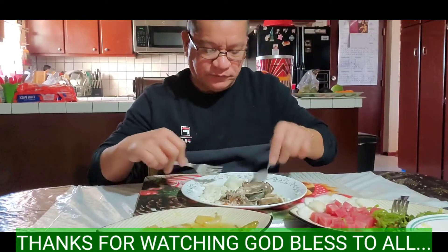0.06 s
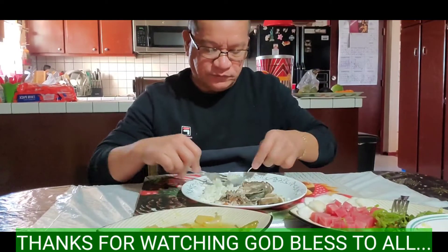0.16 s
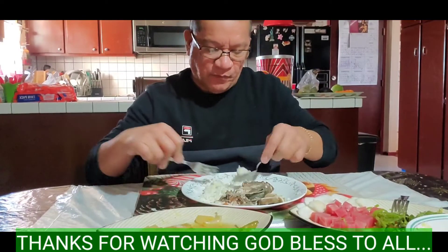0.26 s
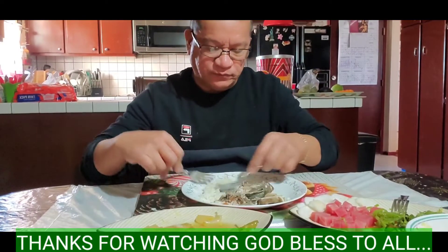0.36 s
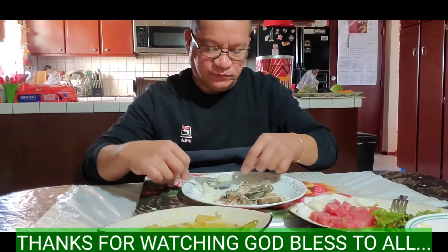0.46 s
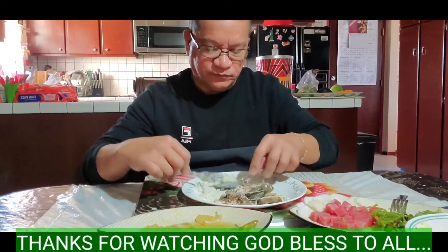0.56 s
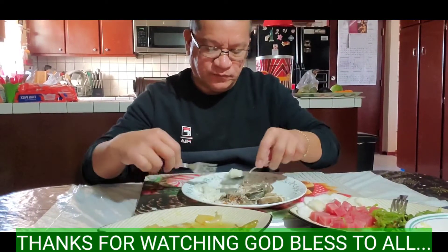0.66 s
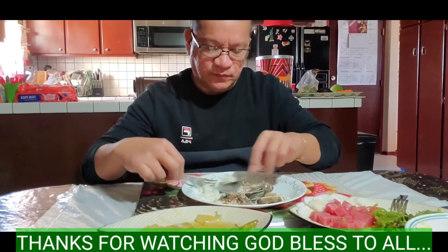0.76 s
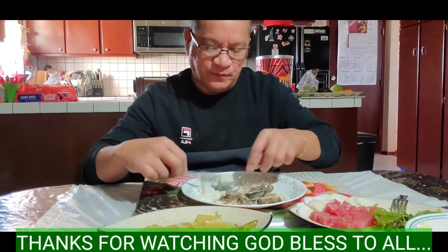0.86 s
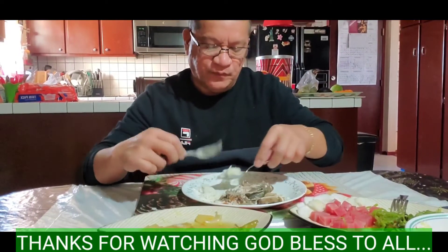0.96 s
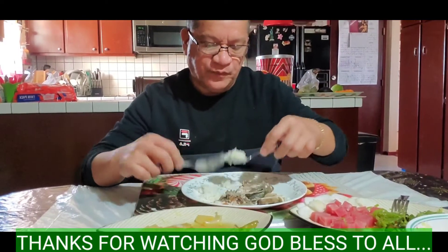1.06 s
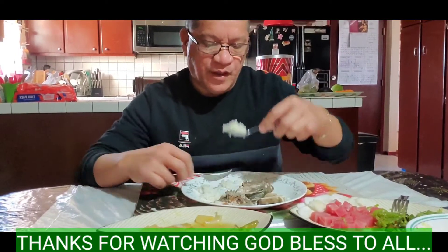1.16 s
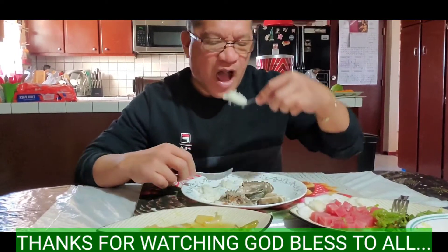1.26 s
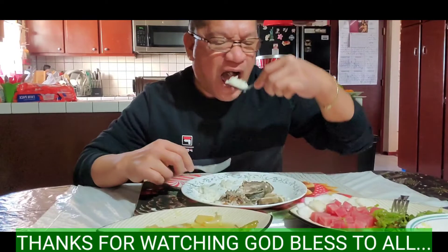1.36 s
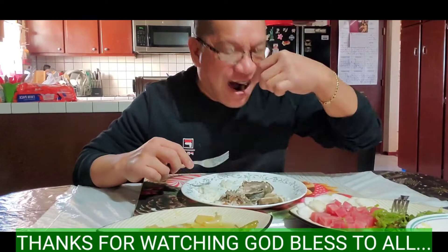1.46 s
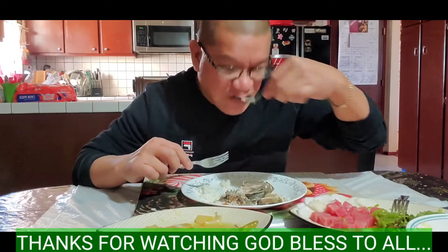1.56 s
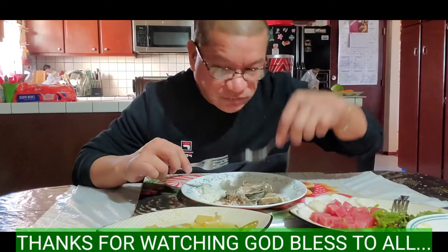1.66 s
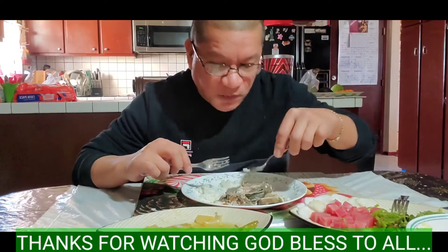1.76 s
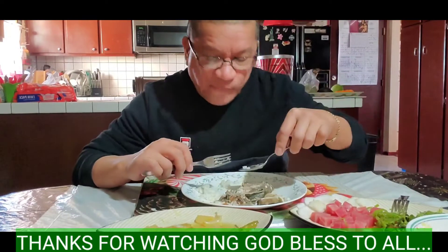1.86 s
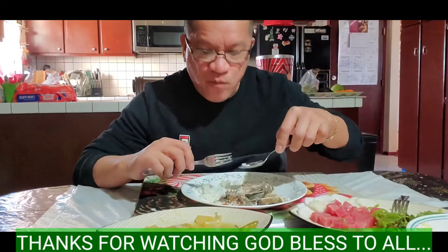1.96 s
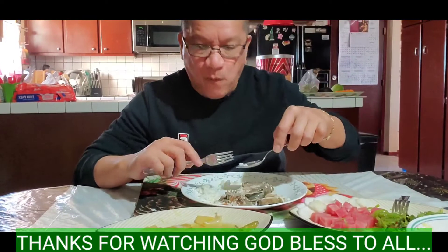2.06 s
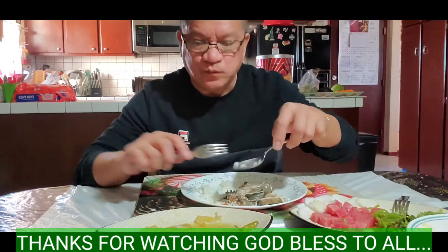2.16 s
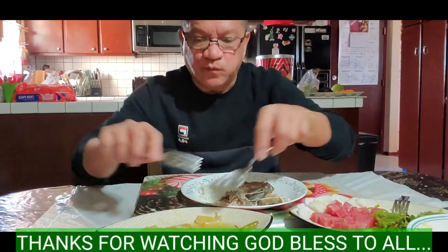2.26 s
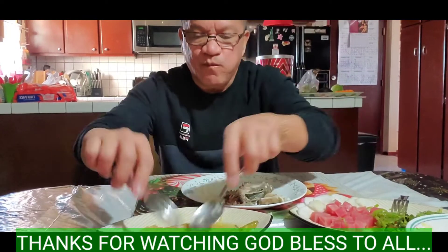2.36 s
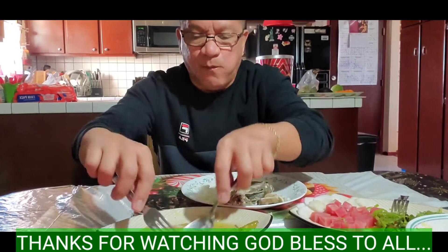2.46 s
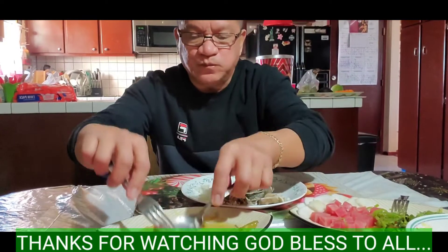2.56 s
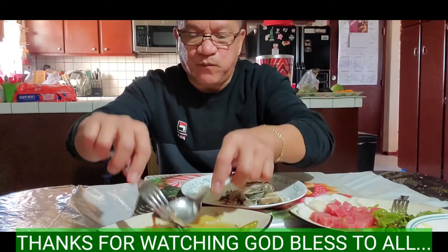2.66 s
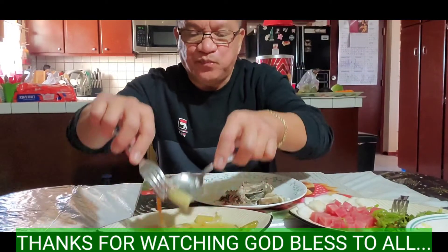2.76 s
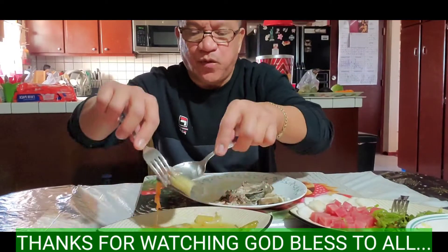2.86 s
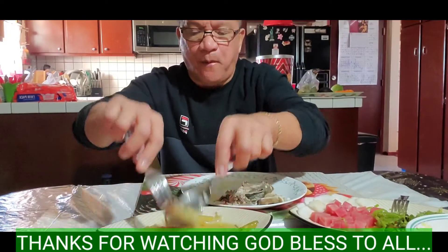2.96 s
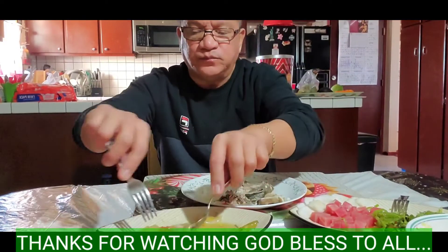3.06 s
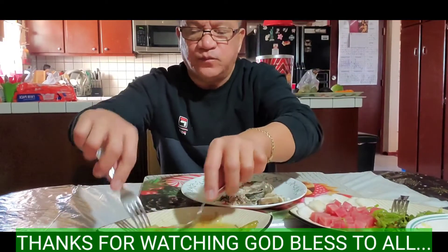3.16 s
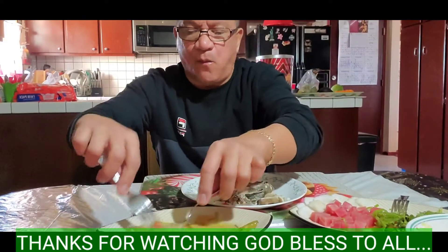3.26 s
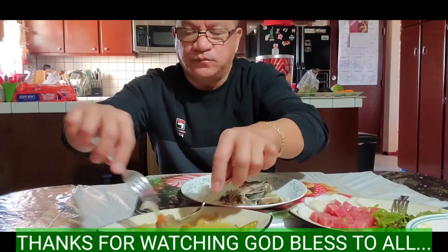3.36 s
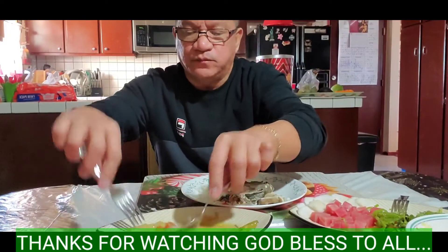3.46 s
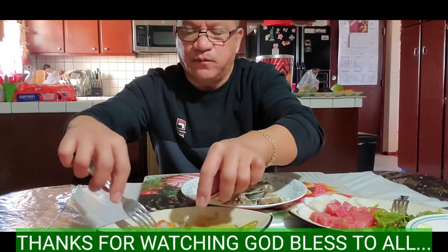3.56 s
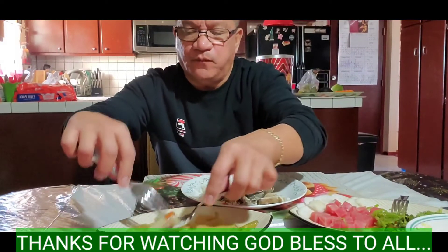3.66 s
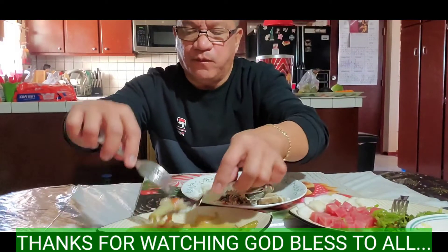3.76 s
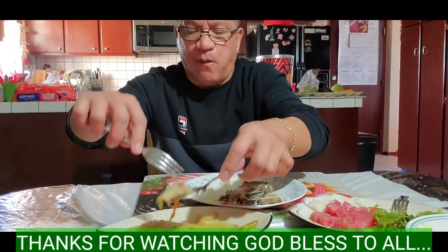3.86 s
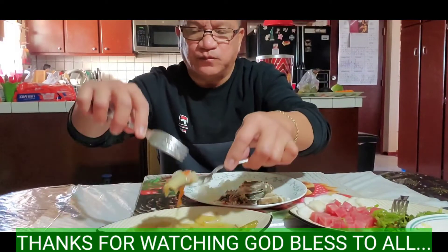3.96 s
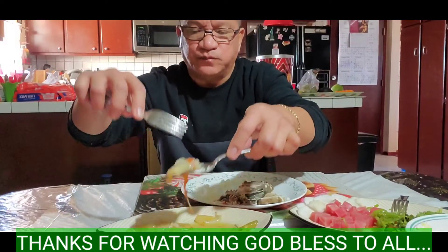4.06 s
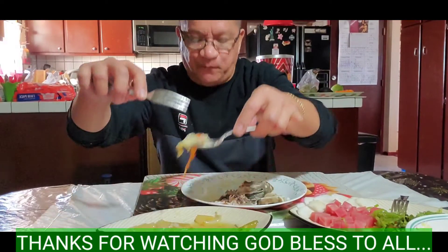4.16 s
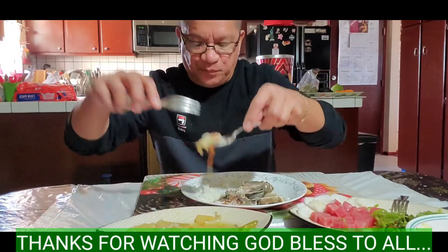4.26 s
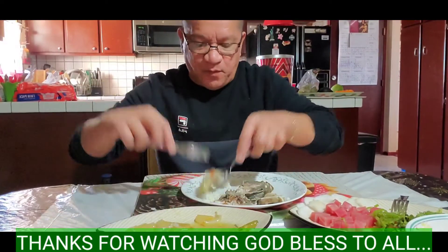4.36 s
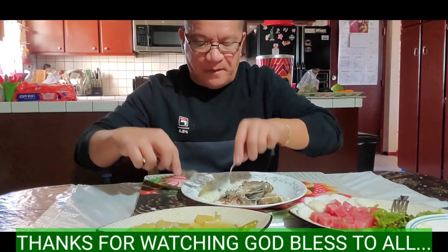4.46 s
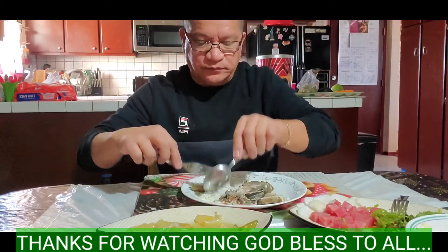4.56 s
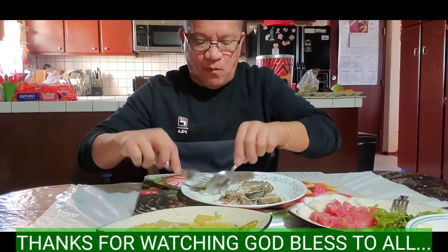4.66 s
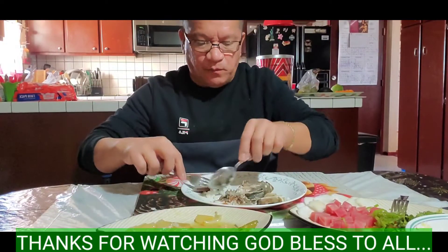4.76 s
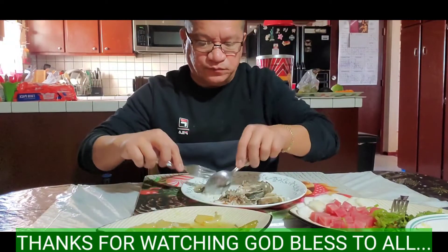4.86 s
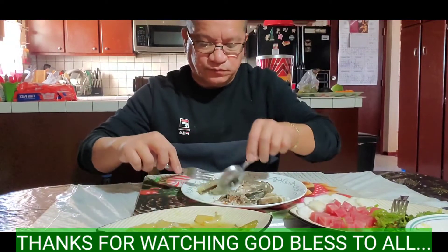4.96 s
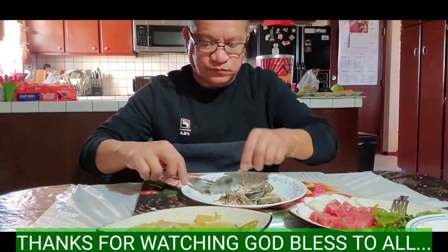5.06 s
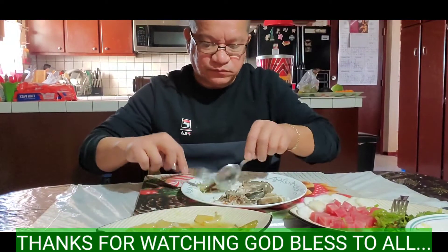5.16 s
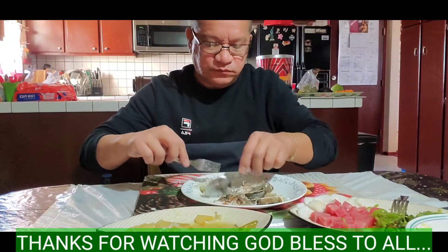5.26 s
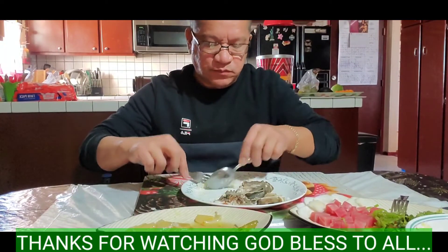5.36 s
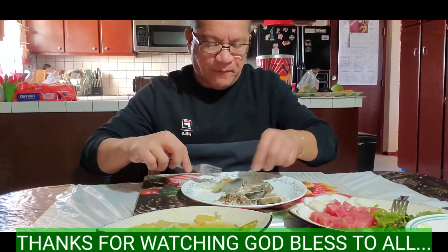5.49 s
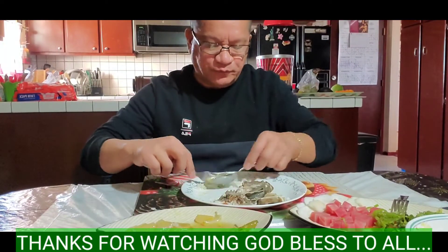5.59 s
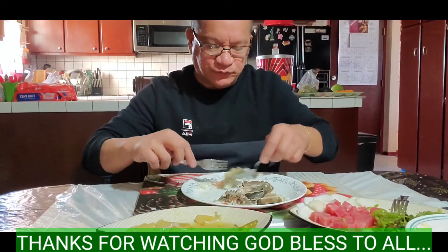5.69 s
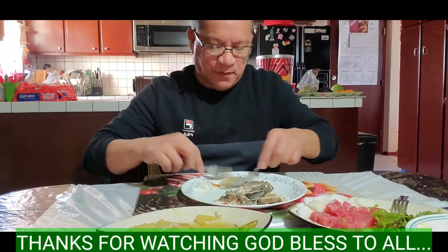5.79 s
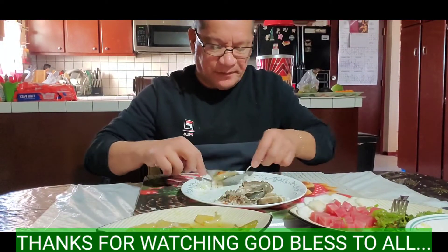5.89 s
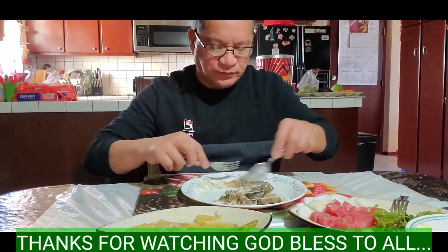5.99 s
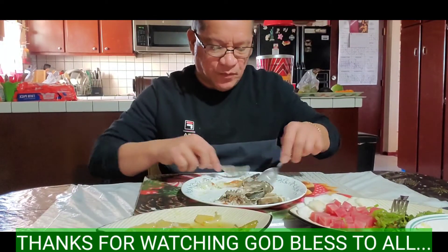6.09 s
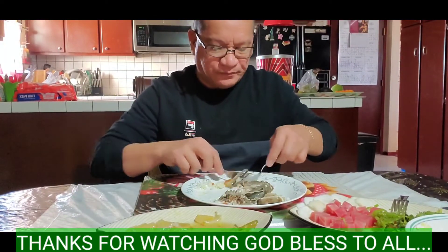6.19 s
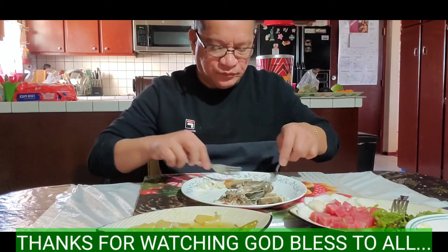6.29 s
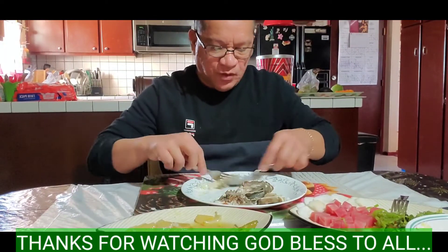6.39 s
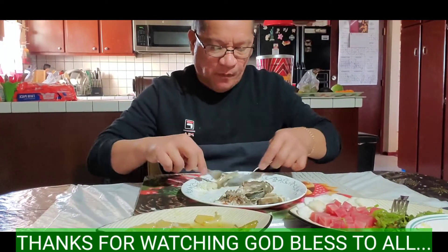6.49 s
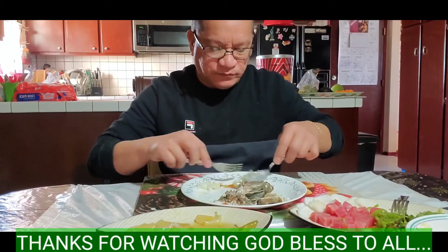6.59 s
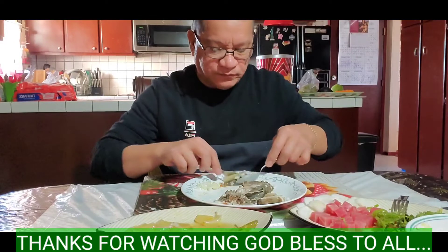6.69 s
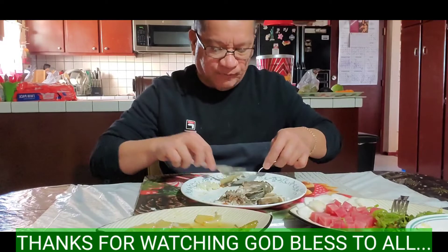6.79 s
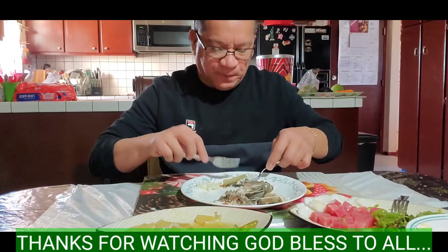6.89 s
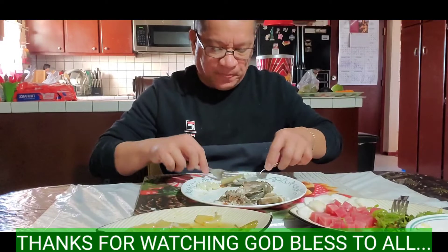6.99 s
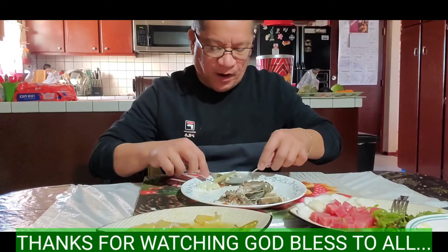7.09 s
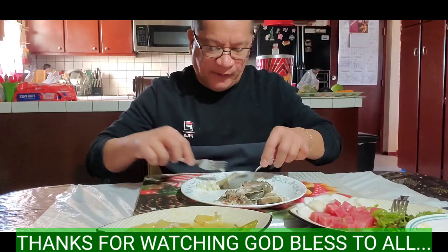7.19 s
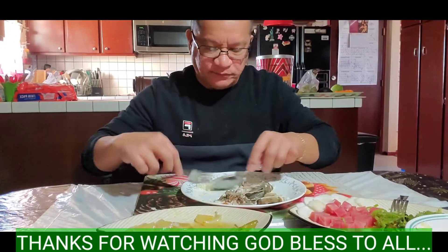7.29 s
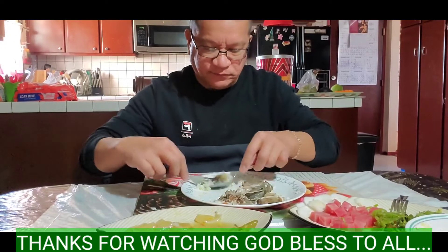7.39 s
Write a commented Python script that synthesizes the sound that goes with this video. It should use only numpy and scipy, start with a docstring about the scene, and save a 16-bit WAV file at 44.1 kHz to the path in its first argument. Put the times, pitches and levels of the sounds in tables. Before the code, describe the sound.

Short, dry clacks of cutlery on a food-damped ceramic dish, mixed with ringing clinks of spoon against fork and two brief gritty scrapes. The activity starts brisk, thins to tiny ticks and dull table bumps, then becomes busy again in the second half. Heard close on spaced microphones at a dining table, with short kitchen reflections and a very quiet low hum of fans.

```python
"""A spoon and a fork knock on a food-laden ceramic plate and against each other at a dining table.
Impact excites damped modes: every blow rings briefly in table, plate and steel, then in a hard-walled kitchen.
Dull bumps boom in the table top, light touches ring singly; rubs and scrapes are bands of uneven noise grains.
Behind them two fans hum as steady tones over filtered noise; a pair of spaced microphones hears it all."""
import sys
import numpy as np
from scipy import signal
from scipy.io import wavfile

SR = 44100
rng = np.random.default_rng(int(sys.argv[2]) if len(sys.argv) > 2 else 0)


def pcm_store(signal):
    """Save signal as 16-bit PCM."""
    levels = np.round(np.clip(np.atleast_2d(signal), -1, 1) * 32767)
    wavfile.write(sys.argv[1], SR, levels.astype(np.int16).T)


N = 327663   # samples, 7.43 s


def amp(db):
    """Level law: 20 dB is a factor of ten in amplitude."""
    return 10 ** (np.asarray(db) / 20)


def at_hz(points, hz):
    """Logarithmic frequency scale: interpolate a (f/Hz, value) table along it, holding the end values."""
    f, value = np.array(points).T
    return np.interp(np.log(hz), np.log(f), value)


def ring(force, hz, t60):
    """Damped resonator: a unit impulse sets off a decaying sine of nominal height 1; t60 is at least 2 ms."""
    radius = amp(-60 / (max(t60, .002) * SR))
    angle = 2 * np.pi * hz / SR
    # the tiny offset keeps the filter away from denormal numbers
    return signal.lfilter([0, np.sin(angle)], [1, -2 * radius * np.cos(angle), radius ** 2], force + 1e-18)


def band_pass(order, band, x):
    """Band-pass filtering: only the part of the spectrum between two frequencies is kept."""
    return signal.sosfilt(signal.butter(order, band, "band", fs=SR, output="sos"), x)


# coherence of a diffuse field at two spaced microphones: (f/Hz, left-right correlation)
DIFFUSE_COHERENCE = [(40, .8), (100, .93), (290, .95), (640, .7), (1400, .35), (3100, .1), (15000, 0)]


def diffuse_bands(size):
    """Diffuse-field coherence: half-octave stereo noise, alike in the bass, unrelated in the treble."""
    edges = 20 * 2 ** np.arange(0, 10.1, .5)
    tops = np.minimum(edges[1:], .45 * SR)
    white = rng.standard_normal((2, 2, size))
    for k, (low, high) in enumerate(zip(edges, tops)):
        # neighbouring bands draw on different noise
        mid, side = band_pass(2, [low, high], white[k % 2])
        hz = np.sqrt(low * high)
        alike = np.clip(at_hz(DIFFUSE_COHERENCE, hz), 0, 1)
        yield hz, np.sqrt(1 + alike) * mid + np.sqrt(1 - alike) * side * [[1], [-1]]


# tones of blades at 85 and 94 passes a second, and their side tones: (f/Hz, rms level/dB)
FAN_TONES = [(85, -86.5), (94.2, -77.5), (169.9, -80), (173.4, -94), (188.6, -72.5), (191.9, -75),
             (233, -78.5), (255, -73), (277.1, -75.5), (340, -72.5), (381.4, -82), (425.1, -82.5),
             (471.4, -79), (520, -85.5), (565.9, -82.5), (680, -84)]
# spectral density of fan draught and hiss, relative: (f/Hz, level/dB per Hz)
FAN_DRAUGHT = [(15, -104), (25, -70.5), (83, -10.5), (135, -14.5), (177, -7), (220, -16), (245, -4),
               (339, 0), (399, -10.5), (470, -7.5), (726, -19.5), (1150, -19.5), (2090, -35.5),
               (4130, -41.5), (16500, -49)]
DRAUGHT_RMS_DB = -66.5


def fans():
    """Blade-passing tones: steady sines at random phase over broadband flow noise."""
    t = np.arange(N) / SR
    tones = sum(np.sqrt(2) * amp(db) * np.sin(2 * np.pi * (hz * t + rng.random())) for hz, db in FAN_TONES)
    draught = sum(amp(at_hz(FAN_DRAUGHT, hz)) * noise for hz, noise in diffuse_bands(N))
    return tones + amp(DRAUGHT_RMS_DB) * draught / draught.std()


# reverberation time of the kitchen: (f/Hz, t60/s)
KITCHEN_T60 = [(100, 0.61), (300, .5), (1000, 0.27), (4000, 0.26), (14000, 0.25)]
ROOM_DB, ROOM_BUILD_S = -26.5, .006
NEAR_DB, NEAR_T60_S = 3, .04   # early energy from near surfaces, relative to the tail


def kitchen(dry):
    """Reverberation: reflections set in after a short gap, strong at first, then decay band by band."""
    t = np.arange(round(.7 * SR)) / SR
    tail = sum(noise * amp(-60 * t / at_hz(KITCHEN_T60, hz)) for hz, noise in diffuse_bands(len(t)))
    build_up = 1 - np.exp(-(t / ROOM_BUILD_S) ** 2)
    near_surfaces = 1 + amp(NEAR_DB - 60 * t / NEAR_T60_S)
    tail *= build_up * near_surfaces
    return amp(ROOM_DB) * signal.fftconvolve(dry, tail, axes=1)[:, :N]


# rubs and scrapes, the two loudest of cutlery rattling between blows:
# (t/s, length/s, centre f/Hz, width/octaves, level/dB rms before the fade)
RUBS_AND_SCRAPES = [(1.639, 0.13, 5960, 6, -84), (2.405, 0.051, 9000, 1.5, -84.5),
                    (2.927, 0.04, 7940, 1.9, -75.5), (3.054, 0.046, 10100, 10, -77.5),
                    (4.33, 0.054, 3450, 0.64, -80), (4.57, 0.077, 13140, 0.54, -89),
                    (5.946, .09, 4500, 2.16, -87), (5.983, 0.056, 3575, 2.6, -61),
                    (6.541, 0.061, 3600, 2.2, -64), (7.276, 0.11, 7000, 4.2, -80.5),
                    (1.356, 0.047, 1600, 0.36, -79), (3.856, 0.12, 1550, 0.15, -78),
                    (7.376, 0.067, 2170, 0.41, -78.5), (2.182, 0.052, 3950, 0.71, -89)]


def rubs_and_scrapes():
    """Friction noise: dense uneven grains through a band, with a sharp onset and a fade."""
    out = np.zeros(N)
    grains = rng.standard_normal(N) * amp(3.2 * np.minimum(rng.exponential(1, N), 5))
    for s, length, hz, octaves, level_db in RUBS_AND_SCRAPES:
        at, size = round(s * SR), round(length * SR)
        half_width = 2 ** (octaves / 2)
        band = [hz / half_width, min(hz * half_width, .45 * SR)]
        stroke = band_pass(2, band, grains[at:at + size])
        fade = np.minimum(np.arange(size) / 200, np.linspace(1, 0, size))
        # the last rub may run past the end
        out[at:at + size] += amp(level_db) * stroke / stroke.std() * fade[:len(stroke)]
    return out


# light touches of steel on steel or food: (t/s, nominal peak level/dB, ring f/Hz)
LIGHT_TOUCHES = [(0.4402, -54, 3720), (1.6541, -63.5, 7330), (1.6794, -59, 4300), (1.726, -62, 4280),
                 (1.7394, -72, 4520), (1.929, -73, 3710), (2.2094, -72.5, 3610), (2.433, -64.5, 4130),
                 (2.523, -63, 4100), (2.819, -62.5, 4250), (2.9354, -64.5, 3300), (3.0616, -70, 11200),
                 (3.3774, -69, 3550), (3.5581, -80.5, 5670), (4.1194, -73.5, 4120), (4.3294, -76, 4020),
                 (4.354, -71.5, 4000), (4.4687, -74.5, 4200), (4.6004, -72, 11340), (4.639, -73, 10600),
                 (4.7284, -75, 3680), (6.9394, -64, 9200), (7.2994, -80, 9070), (7.3544, -78, 9500)]
TOUCH_T60_S, TOUCH_TICK_DB = .011, -12   # tick relative to the ring, before differencing
TICKS_PER_S, TICK_DB = 14, -83   # crackle of food and cloth; lowest level, before differencing


def touches():
    """Single-mode impact: a short ring with a bright doubly differenced tick; fainter ticks fall at random."""
    out, click = np.zeros(N + 2000), np.eye(1, 2000)[0]
    tick = np.diff(click, 2, prepend=[0, 0])
    for s, peak_db, hz in LIGHT_TOUCHES:
        at = round(s * SR)
        out[at:at + 2000] += amp(peak_db) * (ring(click, hz, TOUCH_T60_S) + amp(TOUCH_TICK_DB) * tick)
    tick_falls = rng.random(N) < TICKS_PER_S / SR
    crackle = tick_falls * amp(TICK_DB + 4.3 * np.minimum(rng.exponential(1, N), 3))
    return out[:N] + np.diff(crackle, 2, prepend=[0, 0])


# dull bumps of arm or dish through the table: (t/s, nominal level/dB, f/Hz)
TABLE_BUMPS = [(2.619, -54, 95), (2.891, -63.5, 130.4), (3.419, -57, 104.5), (3.728, -57.5, 90),
               (4.63, -62, 88), (5.47, -55, 100), (6.269, -61.5, 95.8)]


def bumps():
    """Soft impact: a smooth 4.6 ms push sets one low mode of the table top booming, t60 0.12 s."""
    out = np.zeros(N + SR)
    push = np.pad(np.hanning(round(.0046 * SR)), (0, round(.3 * SR)))
    push /= push.sum()
    for s, level_db, hz in TABLE_BUMPS:
        at = round(s * SR)
        out[at:at + len(push)] += amp(level_db) * ring(push, hz, .12)
    return out[:N]


# knocks of cutlery on the dishes, with the strength each body takes up: (t/s, spoon level/dB, fork level/dB,
# steel ring level/dB, plate level/dB, thud level/dB, f/Hz and level/dB of the one note the grip leaves free)
DISH_KNOCKS = [(0.1126, -38.5, -50, -35, -48, -48.5, 4890, -39.5),
               (0.2845, -29.5, -36.5, -33.5, -37.5, -46.5, 5440, -39),
               (0.5402, -34, -45.5, -45.5, -37.5, -51, 5650, -38.5),
               (0.9462, -35.5, -42, -36, -41, -48, 5740, -42),
               (1.708, -55, -54, -64, -64.5, -67, 4400, -56),
               (2.6199, -37, -50.5, -41.5, -67, -48.5, 3664, -37),
               (3.408, -60.5, -53.5, -73.5, -82.5, -59, 4050, -60.5),
               (3.4182, -50.5, -71, -51.5, -74.5, -64.5, 8025, -55.5),
               (3.7589, -56.5, -55.5, -62.5, -67, -64.5, 4560, -52),
               (4.816, -33, -36.5, -43.5, -55, -51, 3730, -40),
               (5.0409, -39, -46.5, -55, -55.5, -53.5, 4680, -48.5),
               (5.251, -42, -51, -43, -46.5, -48.5, 3320, -57.5),
               (5.47, -21.5, -33.5, -29.5, -36.5, -47.5, 5620, -32.5),
               (5.7005, -32, -40.5, -39.5, -40, -49.5, 5630, -56),
               (5.9263, -65, -69.5, -76, -71, -72.5, 3680, -76.5),
               (5.9841, -50.5, -56.5, -52, -55, -64, 5400, -49.5),
               (6.2709, -28.5, -30.5, -35.5, -47, -41, 3890, -44.5),
               (6.5277, -54.5, -45.5, -51, -57, -63, 5320, -52),
               (6.5733, -44.5, -56, -56, -53, -59, 5350, -48),
               (6.8179, -37, -40.5, -42, -52, -47.5, 5580, -38)]
# clinks of spoon against fork, where the steel rings free and the dish takes the jolt:
# (t/s, ring level/dB, rattle level/dB, thud level/dB)
STEEL_CLINKS = [(0.5592, -31, -41, -49.5), (6.0249, -33, -53.5, -45), (6.314, -24, -40.5, -41.5),
                (6.5991, -40, -52.5, -52), (6.8738, -36, -52, -44.5), (7.1787, -31.5, -54.5, -44.5)]
# plate low, plate high, tines, bowl and edge, each relative to the rattle: (level/dB)
CLINK_RATTLE_DB = [-16.5, -17.5, -8.5, 2.5, -14.5]
# while the cutlery works in the serving bowl: (start t/s, end t/s)
SERVING_SPAN = (2.5, 4.0)
SERVING_PLATE_DB = -12.5   # there the plate's upper modes stay quiet
TABLE_DB, PLATE_HIGH_DB = -5, -12   # table over thud, upper plate modes over spoon
EDGE_DB = 2   # over the mean of spoon and fork
CLINK_TABLE_DB = -11   # table over thud
KNOCK_PAN_DB, CLINK_PAN_DB = .86, -1   # left over right


def strengths():
    """Energy sharing: rows in time order of t/s, eight part level/dB, free notes (f/Hz, level/dB), pan/dB."""
    rows = []
    start, end = SERVING_SPAN
    for s, spoon, fork, steel, plate, thud, hz, note_db in DISH_KNOCKS:
        serving = start < s < end
        plate_high = spoon + PLATE_HIGH_DB + serving * SERVING_PLATE_DB
        edge = (spoon + fork) / 2 + EDGE_DB
        parts_db = [thud + TABLE_DB, thud, plate, plate_high, fork, spoon, steel, edge]
        rows.append((s, parts_db, [(hz, note_db)], KNOCK_PAN_DB))
    for s, steel, rattle, thud in STEEL_CLINKS:
        *body, edge = rattle + np.array(CLINK_RATTLE_DB)
        rows.append((s, [thud + CLINK_TABLE_DB, thud, *body, steel, edge], [], CLINK_PAN_DB))
    return sorted(rows, key=lambda row: row[0])


# modes of table, food-damped dish, plate low, plate high, fork tines, spoon bowl, steel ring, edge:
# one list a part of (f/Hz, relative level/dB, t60/s)
PART_MODES = [
    [(191, 3, 0.087), (263, 2, 0.04)],
    [(354, 1.5, 0.025), (484, -3, 0.042), (858, 1, 0.017)],
    [(1235, 5.5, 0.017), (1433, 1.5, 0.031), (1544, 1.5, 0.039), (1689, 0, 0.029)],
    [(1938, 7.5, 0.013), (2374, 7, 0.012), (2671, 0.5, 0.037), (3080, 6.5, 0.0092)],
    [(3594, -5.5, 0.026), (3860, -2.5, 0.03), (4245, -1, 0.015)],
    [(4637, -5, 0.013), (5160, -4.5, 0.018), (5665, -3, 0.015), (6590, -6.5, 0.0088), (7120, -10, 0.018),
     (7960, -6.5, .008)],
    [(8710, -5, 0.0083), (8980, 3.5, 0.0047), (9580, -9.5, 0.04), (9780, -4, 0.0072)],
    [(10970, -7, 0.0052), (12200, -9, 0.0055), (13900, -1.5, .004), (14300, 2.5, 0.0015),
     (15000, -17.5, 0.0047)],
]
CHATTER_DB, CHATTER_T60_S = -18, .0016   # noise of the contact, relative to its unit impulse
NOTE_T60_S = .026


def blows():
    """Modal superposition: each blow chatters and drives every mode; five spots of the table take turns."""
    size, rows = round(.2 * SR), strengths()
    spots = np.zeros((5, 2, N + SR))
    chance_db = rng.normal(0, 2, (len(rows), 48))   # up to six modes in each of eight parts
    chatter_decay = amp(-60 * np.arange(size) / SR / CHATTER_T60_S)
    chatter = rng.standard_normal((len(rows), size)) * chatter_decay
    for i, (s, parts_db, notes, pan_db) in enumerate(rows):
        contact = np.eye(1, size)[0] + amp(CHATTER_DB) * chatter[i]
        sound = np.zeros(size)
        for hz, note_db in notes:
            sound += amp(note_db) * ring(contact, hz, NOTE_T60_S)
        for part, modes in enumerate(PART_MODES):
            rings = np.zeros(size)
            for k, (hz, level_db, t60) in enumerate(modes):
                gain = amp(level_db + chance_db[i, 6 * part + k])
                rings += (-1) ** k * gain * ring(contact, hz, t60)
            # a part radiates little below its lowest mode
            radiation = signal.butter(2, .46 * modes[0][0], "high", fs=SR)
            sound += amp(parts_db[part]) * signal.lfilter(*radiation, rings)
        at = round(s * SR)
        spots[i % 5, :, at:at + size] += amp(pan_db / 2 * np.array([[1], [-1]])) * sound
    return spots[..., :N]


TABLE_ECHO_S, TABLE_ECHO_DB = .0016, -3.5
RIGHT_LAG_S = .0002


def scene():
    """Direct and reverberant field: the plate lies nearer the left microphone; each spot has its own tail."""
    spots = blows()
    spots[0] += touches()
    spots[1] += rubs_and_scrapes()
    spots[2] += bumps()
    # small things radiate no deep bass
    spots = signal.sosfilt(signal.butter(2, 75, "high", fs=SR, output="sos"), spots)
    both = spots.sum(axis=0)
    # the table top throws the first sound back almost at once
    left, right = both + amp(TABLE_ECHO_DB) * np.roll(both, round(TABLE_ECHO_S * SR), axis=1)
    direct = np.array([left, np.roll(right, round(RIGHT_LAG_S * SR))])
    # the microphone housing lifts a treble band at the right port and barely alters it at the left
    treble = band_pass(1, [8300, 10800], direct)
    direct += treble * [[-.1], [1.6]]
    return direct + sum(kitchen(spot) for spot in spots) + fans()


def record(dry):
    """Band limitation: a steep low-pass cuts the top from 16.8 kHz."""
    return signal.sosfilt(signal.cheby2(12, 70, 16800, fs=SR, output="sos"), dry)


dry = scene()
out = record(dry)
pcm_store(out)
```